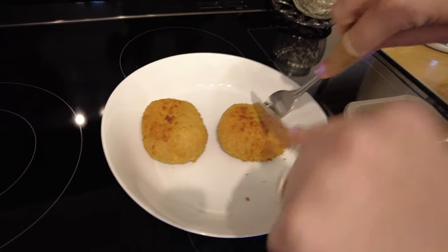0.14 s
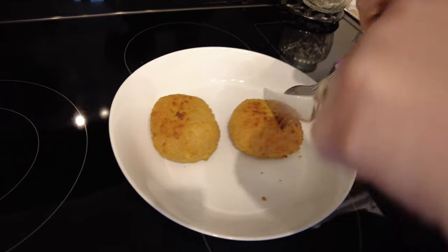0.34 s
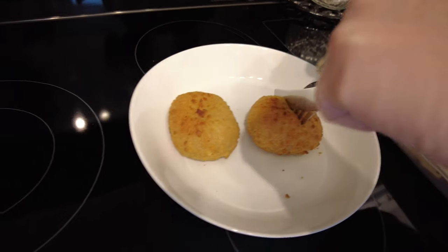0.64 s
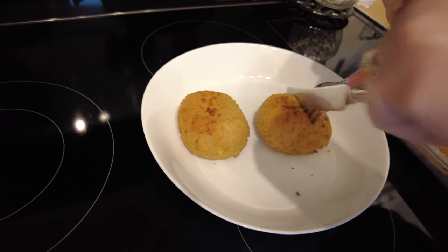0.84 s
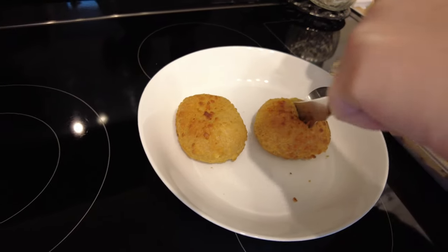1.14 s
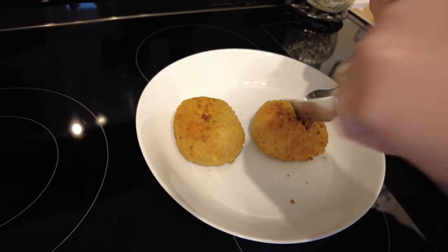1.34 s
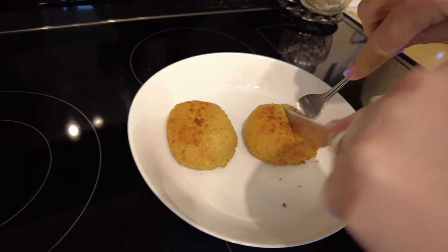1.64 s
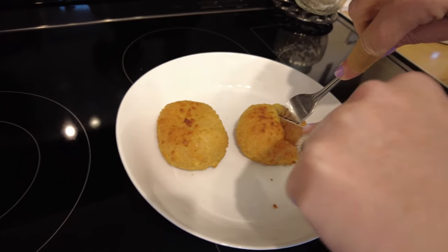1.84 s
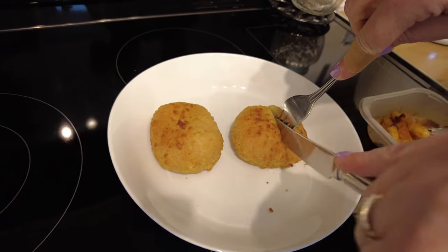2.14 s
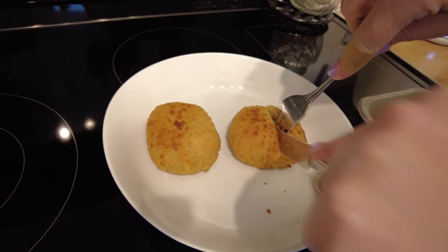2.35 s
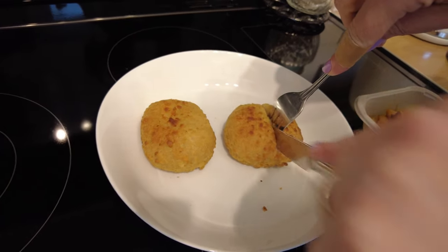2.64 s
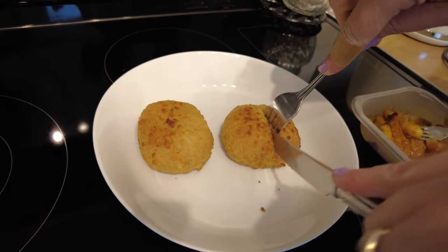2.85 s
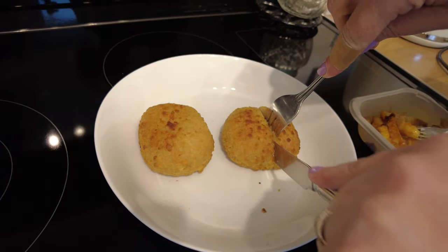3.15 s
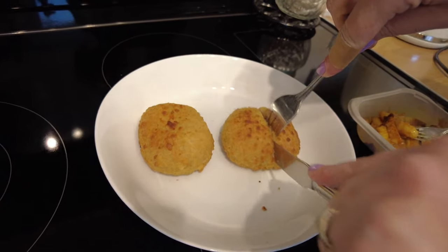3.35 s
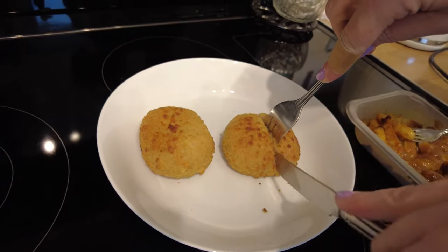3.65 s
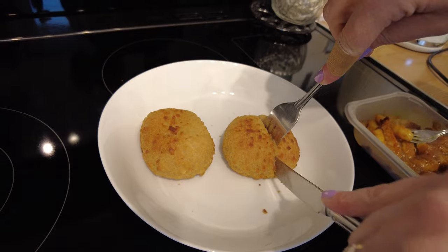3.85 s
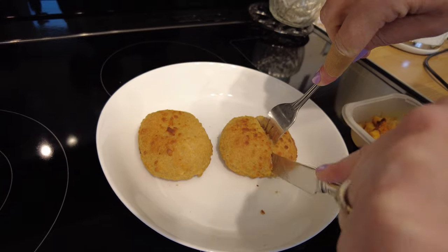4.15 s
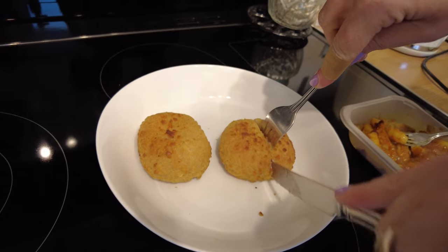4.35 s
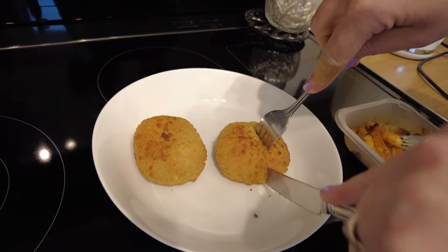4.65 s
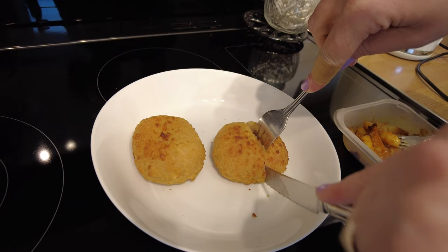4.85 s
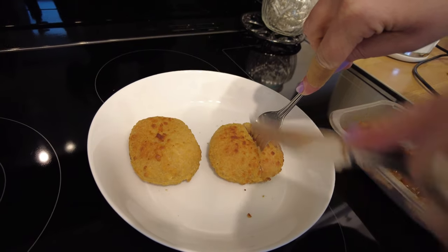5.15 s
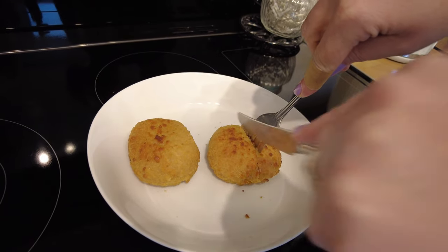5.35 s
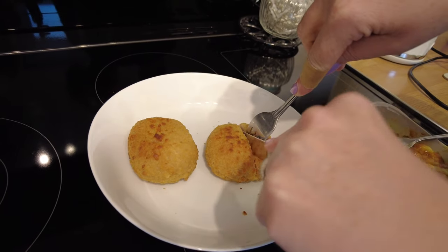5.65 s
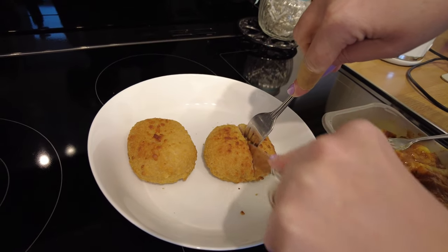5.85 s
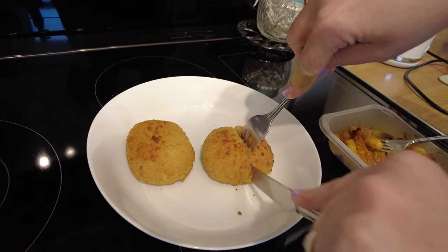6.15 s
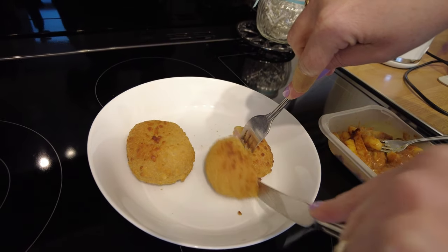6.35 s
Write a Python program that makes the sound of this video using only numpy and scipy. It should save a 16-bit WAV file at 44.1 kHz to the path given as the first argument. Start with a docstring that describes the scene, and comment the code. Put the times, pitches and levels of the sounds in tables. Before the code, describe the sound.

Knife and fork work on breaded food on a ceramic plate, heard close in stereo with short room echo. Sawing rasps are strongest between one and two and a half seconds, ticking with breaking crust. Afterwards the blade mostly drags and taps the plate, the glass hob thudding softly below. The hardest ringing clink comes late, over quiet air noise and low hum.

```python
"""A steel knife saws through a crumb-coated patty on a ceramic plate: grainy noise, shaped like food, rasps and crackles.
Short dry ticks are snaps of crust. Where the blade meets the plate, ringing modes and a noisy crack
make clinks, and rubbing the same modes makes scrapes. A fork's tines twang once.
The glass hob under the plate rumbles with the force of the knife and thuds with bumps of the hands.
All this is heard close by, in stereo, in a small kitchen with faint air noise and a low hum."""
import sys
import numpy as np
from scipy import signal
from scipy.fft import rfft, irfft, next_fast_len
from scipy.io import wavfile

SR = 44100
rng = np.random.default_rng(int(sys.argv[2]) if len(sys.argv) > 2 else 0)


def int16_out(signal):
    """Quantize to a 16-bit WAV file."""
    q = np.round(np.clip(np.atleast_2d(signal).T, -1, 1) * 32767)
    wavfile.write(sys.argv[1], SR, q.astype(np.int16))


N = 286209  # length of the scene in samples


def amp(db):
    """Turn decibels into a gain."""
    return 10 ** (np.asarray(db) / 20)


def unit(x):
    """Scale a sound to an rms level of 1."""
    return x / np.sqrt(np.mean(x ** 2) + 1e-20)


def along(points, hz):
    """Read a curve of (Hz, value) points at any frequency, on a log axis."""
    f, v = np.transpose(points)
    return np.interp(np.log(hz + 1), np.log(f + 1), v)


def causal(x, gain):
    """Filter x by a gain of frequency, with minimum phase so that nothing sounds before its cause."""
    m = 2 * next_fast_len(x.shape[-1] // 2 + 4096)
    log_gain = np.log(np.maximum(gain(np.fft.rfftfreq(m, 1 / SR)), 1e-5))
    # folding the cepstrum onto positive times gives the minimum phase
    cepstrum = irfft(log_gain)
    cepstrum[1:m // 2] *= 2
    cepstrum[m // 2 + 1:] = 0
    response = np.exp(rfft(cepstrum))
    return irfft(rfft(x, m) * response)[..., :x.shape[-1]]


def colour(x, points):
    """Shape x by a spectrum of (Hz, dB) points."""
    return causal(x, lambda hz: amp(along(points, hz)))


def add(track, s, x):
    """Mix x into the track from time s in seconds."""
    part = track[..., round(s * SR):][..., :x.shape[-1]]
    part += x[..., :part.shape[-1]]


def grains(rate, spread_db, size):
    """Random tiny slips, so many a second, a few much larger than the rest."""
    sizes = amp(spread_db * np.minimum(rng.exponential(size=size), 4))
    happens = rng.random(size) < rate / SR
    return unit(happens * sizes * rng.choice([-1, 1], size))


def ring(modes, vary_db, damping):
    """A body's modes ring and fade; strengths vary each time, and high tones reach the two sides out of step."""
    hz, db, t60 = np.transpose(modes)[:, :, None]
    t, life = np.arange(SR // 3) / SR, t60 / damping
    # dividing by the root of the life lets each dB value stand for energy
    size = amp(db + vary_db * rng.standard_normal(hz.shape) - 60 * t / life) / np.sqrt(life)
    side_sign = np.array([-1, 1])[:, None, None]
    out_of_step = rng.choice([-1, 1], hz.shape) * np.minimum(hz / 6000, .65) * side_sign
    phase = rng.uniform(0, 2 * np.pi, hz.shape) + out_of_step
    tones = (size * np.sin(2 * np.pi * hz * t + phase)).sum(1)
    return unit(tones * (1 - np.exp(-t / .0002)))


def ping(hz, db, t60):
    """One mode swells in quickly and fades freely."""
    t = np.arange(SR // 2) / SR
    return amp(db - 60 * t / t60) * np.sin(2 * np.pi * hz * t) * (1 - np.exp(-t / 0.0047))


def gesture(length, db, swell_db, attack, t60):
    """A gain that rises, holds while swelling or sagging, and dies away."""
    length = max(length, .005)
    t = np.arange(round((length + t60) * SR)) / SR
    held = np.minimum(t / length, 1)
    fade_db = 60 * np.maximum(t - length, 0) / t60
    return np.minimum(t / attack, 1) * amp(db + swell_db * (held - .5) - fade_db)


# How long the room's echo lasts. Each row: frequency in Hz, time in seconds to fade by 60 dB.
ROOM_FADE = [(100, 0.1), (500, 0.1), (2600, 0.23), (7000, .3), (15000, 0.087)]


def kitchen(x, near_db, near_t60, tail_db):
    """Direct sound, quick scatter from hob and wall, and the room's tail; the bass is nearly alike on both sides."""
    hz, frames, z = signal.stft(rng.standard_normal((2, SR // 3)), SR, nperseg=256)
    fading = z * amp(-60 * frames / along(ROOM_FADE, hz)[:, None])
    tail = signal.istft(fading, SR, nperseg=256)[1]
    t = np.arange(tail.shape[1]) / SR
    tail = unit(tail * (1 - np.exp(-t / 0.0045)))
    near = unit(rng.standard_normal(tail.shape) * amp(-60 * t / near_t60) * (t > .0007))
    # the quick scatter is weaker in the middle than at the sides
    mid, side = amp(near_db) * near * amp([[-4], [1]]) + amp(tail_db) * tail
    side = causal(side, lambda f: f ** 2 / (f ** 2 + 380 ** 2))
    echo = np.array([mid + side, mid - side]) / np.sqrt(2 * len(t))
    echo[:, 0] += 1  # the direct sound
    echo = echo / np.linalg.norm(echo[0])
    return signal.fftconvolve(np.atleast_2d(x), echo, axes=1)[:, :x.shape[-1]]


def past_hands(x, near_db, near_t60, tail_db):
    """The moving hands keep changing the echo pattern, so overlapping stretches each get their own."""
    out, hop = np.zeros((2, N + SR)), SR // 4
    x = np.pad(np.atleast_2d(x), ((0, 0), (hop, SR)))
    fade = np.pad(signal.windows.cosine(2 * hop), (0, hop))
    for i in range(0, N + hop, hop):
        add(out, i / SR, kitchen(x[:, i:i + len(fade)] * fade, near_db, near_t60, tail_db))
    return out[:, hop:hop + N]


# The colour of the air noise. Each row: frequency in Hz, strength in dB.
AIR_COLOUR = [(20, 10), (45, 0.5), (110, -10), (190, -27.5), (280, -19.5), (500, -29.5), (1100, -30.5),
              (2100, -36.5), (4000, -41), (7000, -45), (15800, -48)]
# The hum of the kitchen. Each row: centre in Hz, width in Hz, rms level in dB.
HUM_BANDS = [(23, 4, -53), (96, 24, -63), (262, 50, -77)]


def background():
    """Steady air noise, wider in the treble, and narrow bands of low hum in the middle."""
    mid, side = colour(rng.standard_normal((2, N)), AIR_COLOUR)
    side = causal(side, lambda hz: 0.19 + .65 * hz / np.hypot(hz, 700))
    air = amp(-45.5) * unit(np.array([mid + side, mid - side]))
    hum = np.zeros(N)
    for hz, width, db in HUM_BANDS:
        band = causal(rng.standard_normal(N), lambda f: 1 / (1 + (2 * (f - hz) / width) ** 2))
        hum += amp(db) * unit(band)
    return air + hum


ATTACK_S, RELEASE_T60_S = 0.036, 0.13  # longest start of a stroke; its fade by 60 dB


def strokes(rows):
    """The gain of a run of knife strokes; a brief catch starts more abruptly than a long stroke."""
    power = np.zeros(N)
    for s, length, db, swell_db in rows:
        attack = np.clip(length / 6, .001, ATTACK_S)
        add(power, s, gesture(length, db, swell_db, attack, RELEASE_T60_S) ** 2)
    return np.sqrt(power)


# The blade moves through the food, in long strokes and brief catches.
# Each row: start in seconds, length in seconds (5 ms at least), rasp in dB halfway through,
# swell of the rasp in dB from start to end, crumbs in dB over the rasp.
CUT_STROKES = [(0.0, 0.043, -61.5, -16, 3.5), (0.096, 0.0084, -56.5, -12, 10), (0.135, 0.047, -60, -24, 5),
               (0.225, 0.077, -67, 2, 3.5), (0.323, 0.14, -60, 7, 4), (0.457, 0.28, -50.5, -2, -5),
               (0.78, 0.027, -51, -7, -4.5), (0.842, 0.14, -54.5, -18, -2), (0.929, 0.0057, -42, -6, -10.5),
               (0.994, 0.08, -48, -4, -5), (1.087, 0.17, -40.5, 10.5, -4.5), (1.274, 0.14, -60.5, -2, -2),
               (1.389, .01, -43.5, -7, -14.5), (1.407, .07, -64.5, 7, 7.5), (1.539, 0.029, -51, -2, -3.5),
               (1.591, 0.21, -40.5, 3, -7), (1.807, 0.12, -47.5, -6, -10), (2.012, 0.044, -52, 2, -1),
               (2.054, 0.11, -59.5, -1, 2), (2.133, 0.059, -41.5, -15, -10.5), (2.239, 0.091, -47, 3, -6.5),
               (2.326, 0.17, -40, -18, -8.5), (2.694, 0.032, -60.5, 4, 3), (2.761, 0.027, -59, 8, -3),
               (2.847, .02, -70.5, 0.5, 1), (2.947, 0.09, -48.5, 7, -12.5), (3.027, 0.17, -55.5, -13, 2),
               (3.171, 0.038, -51, 0, 4.5), (3.78, 0.062, -55, -8, 2), (4.346, 0.0046, -58, 2.5, -2),
               (4.423, 0.011, -65.5, -3.5, 5.5), (4.541, .018, -50, 0, -8), (4.572, 0.013, -44, -10, -12),
               (4.925, .02, -72, -2, 7), (5.1, 0.047, -63.5, 1.5, -15), (5.115, 0.0089, -62, -2, 3),
               (5.622, 0.02, -69.5, 4.5, 19.5)]
# The edge drags on the bare plate.
# Each row: start in seconds, length in seconds, scrape in dB halfway through, swell in dB from start to end.
PLATE_DRAGS = [(2.345, 0.013, -43, -19), (2.45, 0.042, -48, 6), (2.705, 0.036, -59.5, -5),
               (3.2, 0.031, -44.5, -4.5), (3.37, 0.091, -65, -0.5), (3.485, 0.031, -60.5, 4),
               (3.84, 0.088, -62, 14), (3.93, 0.029, -50, 5), (3.98, 0.052, -61.5, 1.5),
               (4.17, 0.026, -68, 5), (4.65, 0.064, -52, 3.5), (5.385, 0.13, -61.5, 2),
               (5.66, 0.026, -52, 2), (5.87, .44, -58.5, 17.5), (6.355, 0.11, -54, -12)]
CUT_SCRAPE_DB = -13  # cutting also rubs the plate a little
DRAG_RASP_DB, DRAG_CRUMBS_DB = -17.5, -7.5  # dragging also rubs food and grinds crumbs
REST_CRUMBS_DB = -81.5  # crumbs stir under the resting cutlery


def knife_work():
    """How hard the knife rasps the food, scrapes the plate and crushes crumbs."""
    cut = strokes([row[:4] for row in CUT_STROKES])
    drag = strokes(PLATE_DRAGS)
    # the crumbs swell half as much as the rasp
    crush = strokes([(s, length, db + crumbs_db, swell_db / 2)
                     for s, length, db, swell_db, crumbs_db in CUT_STROKES])
    rasp = np.hypot(cut, amp(DRAG_RASP_DB) * drag)
    scrape = np.hypot(drag, amp(CUT_SCRAPE_DB) * cut)
    crumbs = np.hypot(crush, amp(DRAG_CRUMBS_DB) * drag) + amp(REST_CRUMBS_DB)
    return rasp, scrape, crumbs


# The colour of the hob's rumble. Each row: frequency in Hz, strength in dB.
HOB_COLOUR = [(20, -3.5), (50, -1), (80, 5), (115, 4.5), (170, -8.5), (210, -15.5), (260, -9), (400, -20),
              (700, -27.5), (1500, -50.5)]
# The hands bump the plate on the hob. Each row: start in seconds, level in dB.
HAND_BUMPS = [(0.565, -42.5), (1.14, -45), (1.469, -49), (2.144, -41.5), (2.333, -34), (2.48, -43.5),
              (3.044, -40), (3.35, -52), (3.405, -52), (3.59, -57.5), (3.8, -48.5), (4.441, -62),
              (4.54, -43), (4.61, -45), (5.135, -59.5), (5.346, -58.5), (5.918, -39.5), (6.02, -44.5),
              (6.159, -40), (6.24, -43.5), (6.44, -38.5)]
BUMP_S, BUMP_T60_S = 0.056, 0.32  # a bump builds up, then fades by 60 dB
SHAKE_DB, SHAKE_GROWS = -31.5, 0.4  # rumble at a knife force of 0 dB; dB of rumble per dB of force


def hob():
    """The force of the knife and the bumps of the hands shake the glass top under the plate."""
    rasp, scrape, _ = knife_work()
    force = np.hypot(rasp, scrape)
    power = (amp(SHAKE_DB) * force ** SHAKE_GROWS) ** 2
    for s, db in HAND_BUMPS:
        add(power, s, gesture(BUMP_S, db, 0, BUMP_S, BUMP_T60_S) ** 2)
    rumble = unit(colour(grains(600, 3, size=N), HOB_COLOUR))
    return past_hands(np.sqrt(power) * rumble, near_db=-5, near_t60=.06, tail_db=-14)


KNOCK_DB, CLACK_DB, BRIGHT_DB = 1, 1, 1  # how far the knock, clack and bright registers stand out
KNIFE_HOLLOW_DB = -6  # a blow that rings the knife has less of the plate's knock and clack
PLATE_TOP_DB, KNIFE_TOP_DB = -5, 4  # the highest register, from plate alone and from knife alone


def registers(ring_db, thud_db, tilt_db, share):
    """Levels of a blow from bass to top: knock lies between thud and ring, a softer contact has less treble."""
    octaves = np.log2(np.array([3800, 6900, 12600]) / 2400)
    clack, bright, top = ring_db + tilt_db * octaves
    hollow = KNIFE_HOLLOW_DB * share
    knock = (thud_db + ring_db) / 2 + KNOCK_DB + hollow
    top += (1 - share) * PLATE_TOP_DB + share * KNIFE_TOP_DB
    return [thud_db, knock, ring_db, clack + CLACK_DB + hollow, bright + BRIGHT_DB, top]


# Where a blow's registers meet: thud, knock, ring, clack, bright and top. A plain list of edges in Hz.
REGISTER_EDGES = [450, 1900, 3400, 4900, 10000]


def balance(x, levels_db):
    """Place and hardness of a blow set how strong each register is in its first 25 ms."""
    edges = [110, *REGISTER_EDGES, 16000]
    pairs = list(zip(edges, edges[1:]))
    for _ in range(2):  # neighbouring registers leak into each other, so go over it twice
        points = []
        for (low, high), db in zip(pairs, levels_db):
            sos = signal.butter(4, (low, high), "band", fs=SR, output="sos")
            band = signal.sosfilt(sos, x[:, :SR // 40])
            lift = db - 20 * np.log10(band.std())
            points += [(low * 1.08, lift), (high / 1.08, lift)]
        x = colour(x, points)
    return x


# Modes of the ceramic plate. Each row: frequency in Hz, energy in dB,
# time in seconds to fade by 60 dB before the damping of each use shortens it.
PLATE_MODES = [(715.6, -10.5, 0.18), (891, -10.5, 0.28), (960, -11, 0.125), (1313, -12, 0.106),
               (2395, -0.5, 0.05), (2430, 0, 0.08), (2384, -10, 0.1), (2696, -3.5, 0.051),
               (2976, -9.5, 0.15), (3040, -10.5, 0.21), (3308, -2, 0.064), (3443, -11.5, 0.032),
               (4070, -11.5, 0.1), (4054, 2, 0.12), (4084, 0, 0.051), (4200, -6, 0.096),
               (4880, -21.5, 0.083), (5556, -10.5, 0.12), (5660, -12, 0.21), (6120, -11, 0.11),
               (6500, -5.5, 0.18), (6700, -12, 0.029), (7220, -12, 0.14), (8840, -15.5, 0.083),
               (9400, -15.5, 0.082), (9410, -8, 0.114), (8750, -6, 0.093), (10812, -3.5, 0.079),
               (13700, -18.5, 0.053), (14586, -25.5, 0.078)]
# Modes of the knife where it touches the plate. Each row: the same as for the plate.
KNIFE_MODES = [(2190, -9.5, 0.08), (2367, -5.5, 0.15), (2600, -5.5, 0.056), (3700, -10, 0.081),
               (4420, -6.5, 0.06), (5220, -16.5, 0.11), (6057, -1, 0.11), (6440, -12, 0.079),
               (7440, -13, 0.1), (9080, -5, 0.091), (9130, -12, 0.12), (10600, -16.5, 0.079),
               (10900, -12, 0.1), (11160, -6.5, 0.051), (12166, -8.5, 0.052), (13200, -18, 0.054),
               (12600, -6, 0.048), (15200, -6.5, 0.09)]
# The colour of the dry crack of contact. Each row: frequency in Hz, strength in dB for a blow on the plate alone.
CRACK_COLOUR = [(130, -15), (280, -3.5), (480, -6.5), (900, -1.5), (1400, -9), (1900, -17), (2400, 2),
                (2900, -7), (3950, 9), (4800, -7.5), (6200, -7.5), (7300, -7.5), (8100, -19.5), (9200, -4),
                (11000, 0.5), (15500, 2.5)]
# The colour of the plate's foot thumping the hob. Each row: frequency in Hz, strength in dB.
THUMP_COLOUR = [(30, -10.5), (80, 0.5), (125, -3), (270, -2.5), (340, -15), (450, -9.5), (700, -13),
                (1500, -19.5), (4000, -45.5)]
# One mode of the rim is hardly touched by the food and sings on.
# One row: frequency in Hz, dB over the blow's ring, time in seconds to fade by 60 dB.
RIM_MODE = (2615, -8.5, .32)
# The fork's tines twang faintly once.
# One row: start in seconds, frequency in Hz, level in dB, time in seconds to fade by 60 dB.
TINES_TWANG = (2.5, 1610, -63, .7)
# Steel meets plate. Each row: start in seconds, ring in dB, thud in dB, treble tilt in dB per octave,
# the knife's share from 0 to 1, strike from 0 (grazing) to 1 (head-on), skid in seconds to fade by 60 dB,
# dry crack in dB over the ring.
PLATE_BLOWS = [(0.1427, -45, -74, -4, .4, 0.59, 0.0027, 7), (0.8777, -44.5, -60.5, -8, 0.1, 1, 0.002, 1),
               (1.0444, -38.5, -53, -9, 0.27, 0.95, 0.0054, 4),
               (1.239, -23.5, -35.5, -3.5, 0.1, 0.98, 0.0029, -4),
               (1.9126, -35.5, -48.5, -0.1, 0, 1, 0.036, 2.5), (2.4944, -41, -42, -11, .55, 0.63, 0.013, 1),
               (3.1965, -36, -45.5, -6, 0.77, 0.88, 0.04, 0),
               (3.477, -53.5, -63.5, -8.5, .3, 0.78, 0.021, -10), (3.8, -53, -55.5, -6.5, 0.43, 1, .01, 6),
               (3.922, -40.5, -52, -5.5, 0.98, 0.65, .048, 1), (4.3484, -55, -91, -4.5, 0.12, 1, .008, 9.5),
               (4.6095, -36.5, -43, -3, 0.75, 0.83, 0.068, 6.5),
               (5.3408, -33.5, -48.5, -1, 0.92, 0.72, 0.016, -4),
               (5.4297, -44.5, -59.5, -1.3, 1, 0.64, .028, 4.5),
               (5.469, -52, -74, -0.2, 0.88, 0.66, 0.11, 0), (5.698, -19, -35.5, -1.2, 0.12, 1, .06, 3.5),
               (6.406, -46.5, -62, -29, 0.24, 0.61, 0.0074, -6)]
CRACK_T60_S, CRACK_WIDTH = 0.0094, 1  # the crack's fade by 60 dB; its side over its middle


def clinks():
    """A blow and a short chattering skid ring plate and knife; the plate's foot thumps the hob."""
    out, t = np.zeros((2, N)), np.arange(SR // 3) / SR
    rim_hz, rim_db, rim_t60 = RIM_MODE
    for s, ring_db, thud_db, tilt_db, share, strike, skid, crack_db in PLATE_BLOWS:
        # a grazing contact swells slowly and chatters more than it strikes
        swell = 1 - np.exp(-t / (0.00051 + 0.0072 * (1 - strike)))
        chatter = grains(2500, 1.3, size=len(t)) * swell * amp(-60 * t / skid)
        force = chatter / np.linalg.norm(chatter) * np.sqrt(skid / 0.058)
        force[0] += strike ** 2

        plate = ring(PLATE_MODES, vary_db=1.5, damping=2.5)
        knife = ring(KNIFE_MODES, vary_db=1.5, damping=2.2)
        body = np.sqrt(1 - share) * plate + np.sqrt(share) * knife

        # the crack loses the plate's colour as the knife takes the blow
        contact = [(hz, db * (1 - share)) for hz, db in CRACK_COLOUR]
        mid, side = colour(rng.standard_normal((2, len(t))) * amp(-60 * t / CRACK_T60_S), contact)
        crack = unit(np.array([mid + CRACK_WIDTH * side, mid - CRACK_WIDTH * side]))

        blow = signal.fftconvolve(body + amp(crack_db) * crack, force[None], axes=1)[:, :len(t)]
        thump = unit(colour(rng.standard_normal(len(t)) * amp(-60 * t / 0.3), THUMP_COLOUR))
        heard = kitchen(blow + amp(-8) * thump, near_db=-6, near_t60=.065, tail_db=-11.5)
        add(out, s, balance(heard, registers(ring_db, thud_db, tilt_db, share)))

        hard = np.interp(ring_db, [-45, -30], [.25, 1])  # a hard blow frees the rim more
        add(out, s, hard * strike * (1 - share) * ping(rim_hz, ring_db + rim_db, rim_t60))
    add(out, TINES_TWANG[0], ping(*TINES_TWANG[1:]))
    return out


# The colour of breaking crust and crumbs. Each row: frequency in Hz, strength in dB.
CRUMB_COLOUR = [(300, -14.5), (1500, 10), (3000, 5), (3800, 0.5), (5500, 2), (7500, 0.5), (12000, 2),
                (15500, 3)]
# The crust snaps. Each row: start in seconds, peak in dB before the room is added.
CRUST_SNAPS = [(0.3015, -25), (0.345, -39), (0.3909, -31.5), (0.4437, -34), (0.471, -37), (0.6894, -27.5),
               (0.7992, -32), (1.001, -33.5), (1.0271, -39), (1.1485, -27), (1.6974, -22.5), (2.343, -26),
               (2.3505, -35), (2.366, -15.5), (2.4723, -34), (2.9758, -33), (3.049, -30.5), (3.1209, -24.5),
               (3.7584, -28.5), (4.193, -43.5), (4.317, -40), (4.712, -34), (4.9, -48)]
SNAP_T60_S = .0018  # a snap's fade by 60 dB


def snaps():
    """Single pieces of crust break with a dry tick."""
    out, t = np.zeros(N), np.arange(SR // 50) / SR
    for s, db in CRUST_SNAPS:
        tick = colour(rng.standard_normal(len(t)) * amp(-60 * t / SNAP_T60_S), CRUMB_COLOUR)
        add(out, s, amp(db) * tick / np.abs(tick).max())
    return kitchen(out, near_db=-4.5, near_t60=.04, tail_db=-5.5)


# The colour of the blade rasping the food. Each row: frequency in Hz, strength in dB.
RASP_COLOUR = [(100, -34.5), (450, -14.5), (720, -4), (950, -1.5), (1150, 3), (1380, 1.5), (1600, -6.5),
               (1850, -24.5), (2250, -24), (2500, -9), (3200, -27), (8000, -49.5)]
# The colour of the edge scraping the plate. Each row: frequency in Hz, strength in dB.
SCRAPE_COLOUR = [(500, -2), (1500, -0.5), (2050, -8), (2370, 0), (3000, 2), (3700, -18.5), (4500, -3.5),
                 (5300, -11.5), (6300, -9.5), (8000, -13), (9300, -6.5), (11000, -15.5), (15000, -20.5)]
GRIP_DB, GRIP_HZ = 0.96, 22.3  # the blade's hold comes and goes within a stroke: rms depth, rough top rate


def sawing():
    """The teeth catch in the food, crumbs crackle, and the edge rubs the plate's modes into a ringing scrape."""
    rasp, scrape, crumbs = knife_work()
    # the uneven grip of the teeth is shared by all three sounds
    fast = unit(causal(rng.standard_normal(N), lambda hz: 1 / (1 + (hz / 90) ** 4)))
    slow = unit(causal(rng.standard_normal(N), lambda hz: 1 / (1 + (hz / GRIP_HZ) ** 4)))
    bite = unit(amp(2.5 * fast) * amp(GRIP_DB * slow))

    food = rasp * bite * unit(colour(grains(700, 3, size=N), RASP_COLOUR))
    crust = crumbs * bite * unit(colour(grains(4000, 4.5, size=N), CRUMB_COLOUR))

    # rubbing damps the modes more than a blow does
    body = ring(PLATE_MODES, vary_db=.1, damping=4) + .6 * ring(KNIFE_MODES, vary_db=.1, damping=4)
    slips = grains(1600, 3.5, size=N)
    ringing = unit(signal.fftconvolve(slips[None], body, axes=1)[:, :N])
    rub = scrape * bite * unit(colour(ringing + amp(-2) * slips, SCRAPE_COLOUR))
    return past_hands(food + crust + rub, near_db=4.5, near_t60=0.039, tail_db=-5)


def scene():
    """All layers on the left and right; cutting and snaps are a little stronger on the right."""
    cutting = (snaps() + sawing()) * amp([[-1], [.8]])  # dB on the left, dB on the right
    return background() + hob() + clinks() + cutting


TOP_HZ = 15800  # upper band limit


def record(dry):
    """Round off the highest peaks and keep next to nothing above the band limit."""
    held = dry / (1 + np.abs(dry / .84) ** 6) ** (1 / 6)
    m = next_fast_len(N + SR // 2)
    low_pass = 1 / (1 + (np.fft.rfftfreq(m, 1 / SR) / TOP_HZ) ** 120)
    return irfft(rfft(held, m) * low_pass, m)[:, :N]


dry = scene()
out = record(dry)
int16_out(out)
```